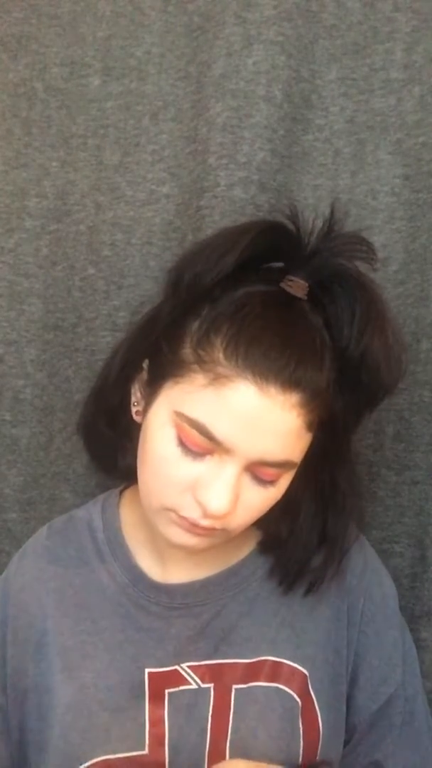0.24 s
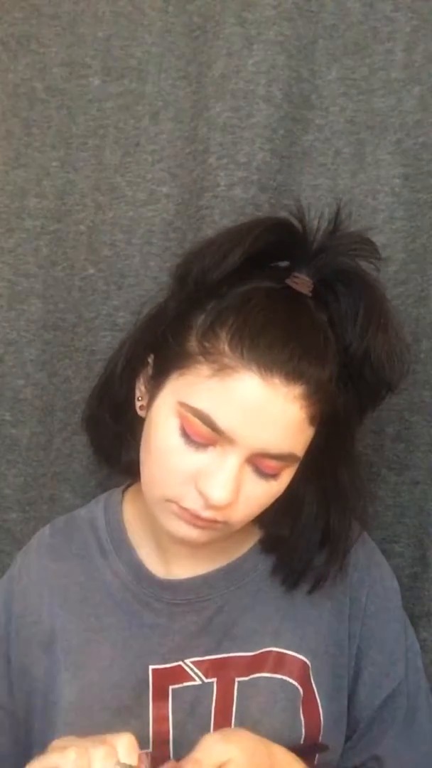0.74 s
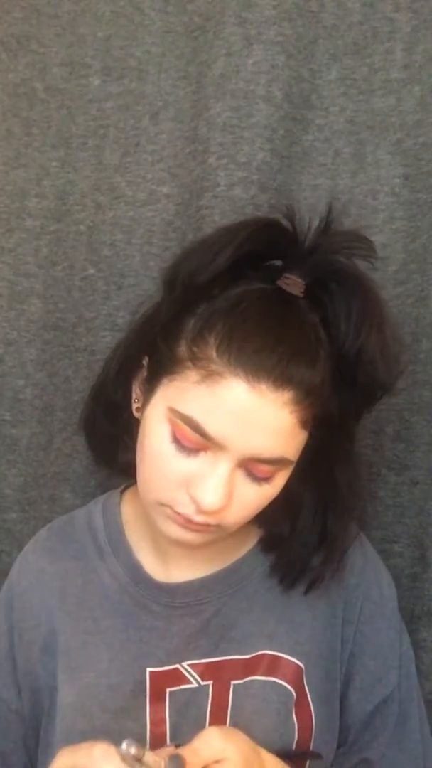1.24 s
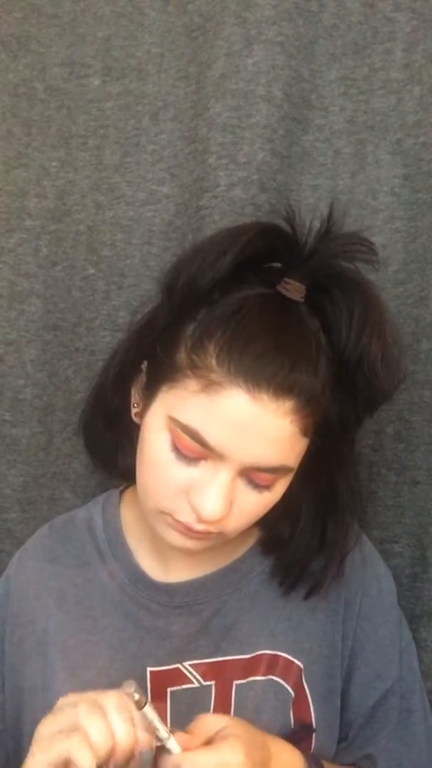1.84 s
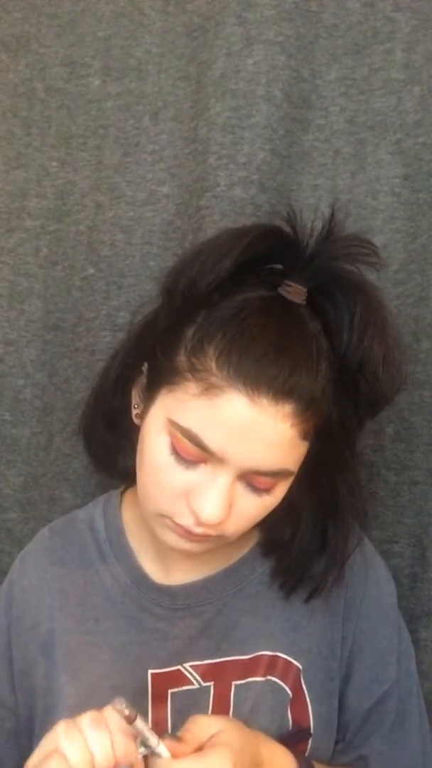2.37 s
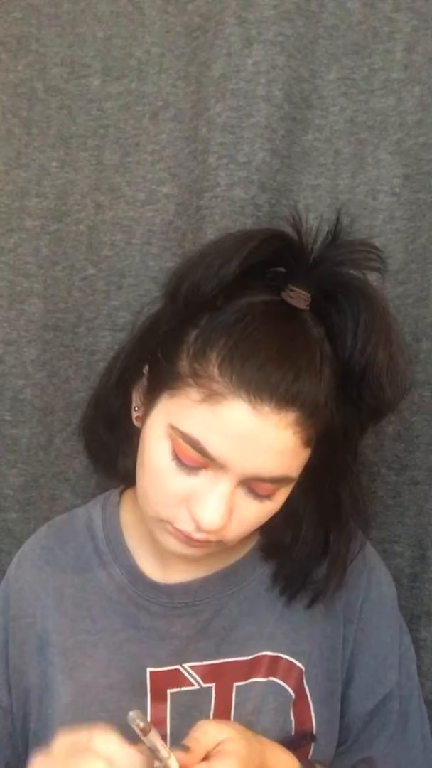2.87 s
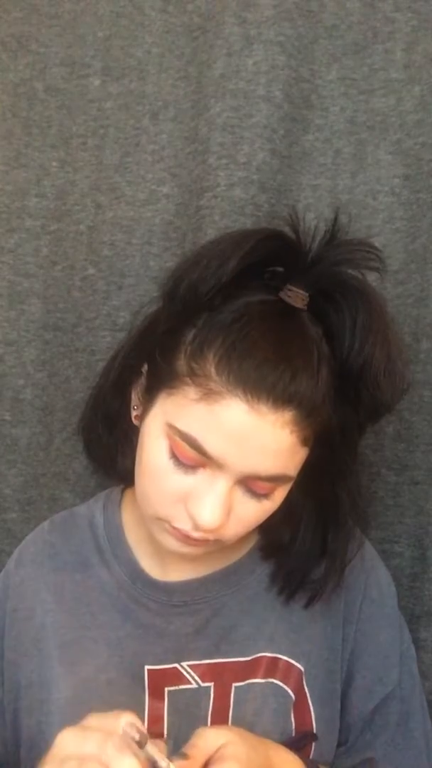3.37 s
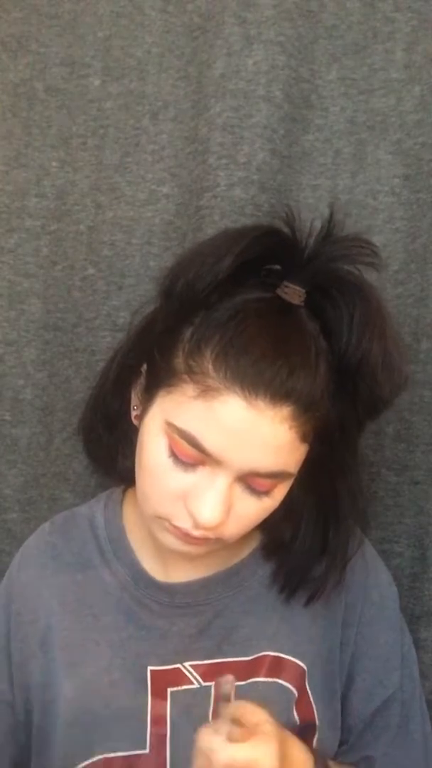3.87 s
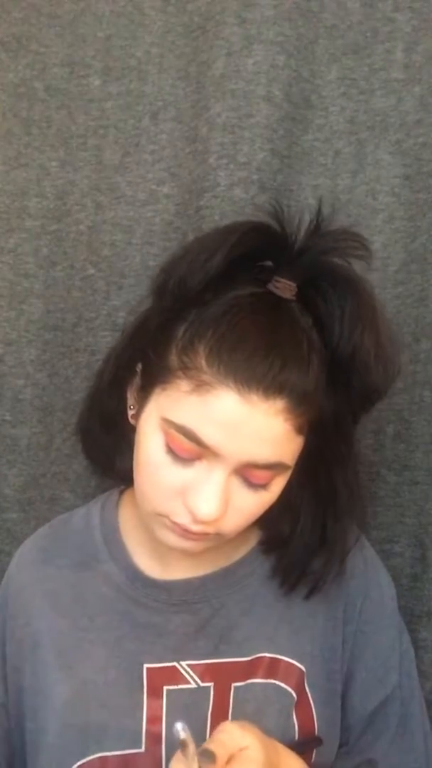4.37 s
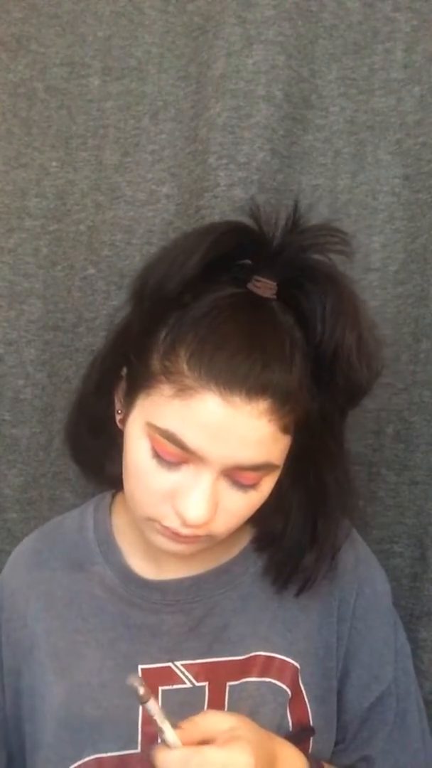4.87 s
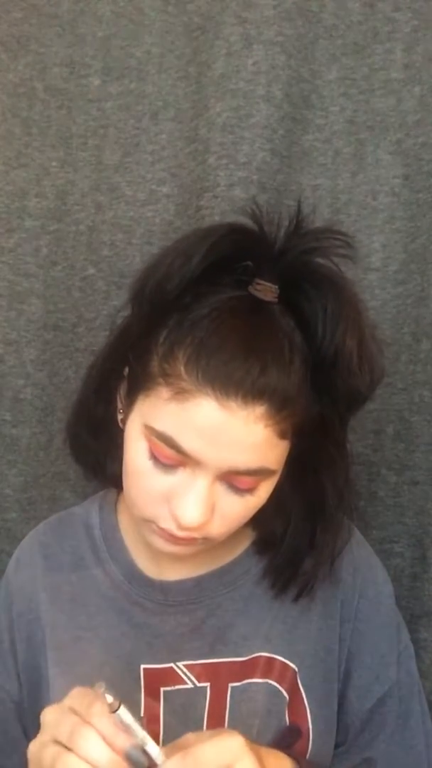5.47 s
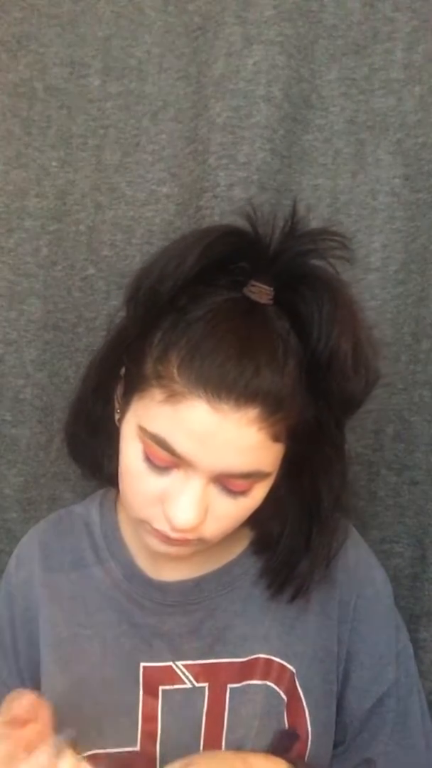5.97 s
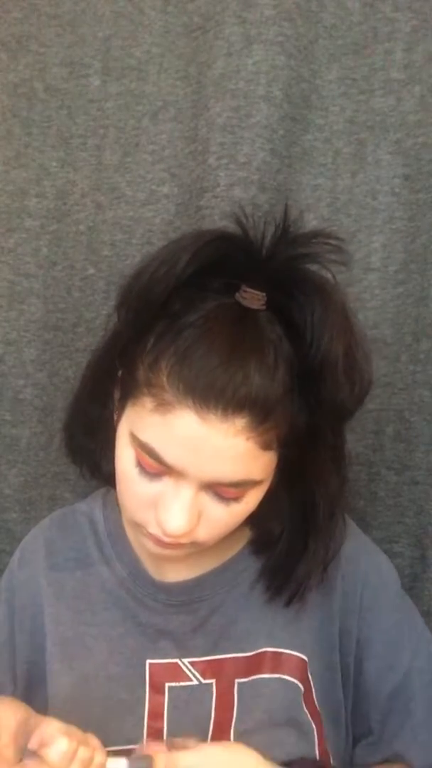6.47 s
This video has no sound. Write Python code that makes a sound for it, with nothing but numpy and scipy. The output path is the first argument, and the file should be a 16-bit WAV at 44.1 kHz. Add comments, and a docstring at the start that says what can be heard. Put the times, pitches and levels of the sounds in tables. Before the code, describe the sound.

Sparse small clicks and taps of a plastic pen turned in the fingers, one loud double snap of its cap, in a quiet humming room.

```python
"""0-6.7 s: filtered-noise hiss and a 59 Hz hum underlie hands turning a plastic pen in a small room.
0.2 s on: noise bursts ring modes of barrel and cap as taps; swells of noise brush as a sleeve.
1.5 s on: grainy noise rubs as skin; tick trains squeak at 2.0 and 2.5 s; a falling sine skids at 2.9 s.
3.8 s: the cap snaps home, a loud double click of stronger bursts over decaying low sines.
4.0 s on: taps and rubs go on; a palm scuffs at 5.7 s, a sleeve brushes from 6.1 s, both dull noise."""
import sys
import numpy as np
from scipy import signal
from scipy.fft import rfft, irfft, next_fast_len
from scipy.io import wavfile
from scipy.ndimage import uniform_filter1d, map_coordinates

SR = 44100
rng = np.random.default_rng(int(sys.argv[2]) if len(sys.argv) > 2 else 0)


def master(y):
    """Save y as 16-bit WAV."""
    cut = np.clip(np.atleast_2d(y).T, -1, 1)
    pcm = np.round(cut * 32767)  # scale
    wavfile.write(sys.argv[1], SR, pcm.astype(np.int16))


N = 296352

SIZE = 4096  # samples per contact spectrum
TOP_HZ = 16200  # band limit of the recorder
KNEE_HZ = 1870  # contact hardness tilts the spectrum above this

# Spectrum of the room hiss. Each row: frequency in Hz, relative density in dB.
AIR_SPECTRUM = [(15, -30), (32, -16.5), (50, 6.5), (95, -3), (125, -5.5), (190, -12.5), (250, -11.5),
                (420, -16.5), (1000, -20.5), (2500, -23.5), (5000, -28.5), (9000, -35), (14500, -38),
                (16000, -43.5)]
# Decay of the room tail. Each row: frequency in Hz, t60 in seconds.
ROOM_DECAY = [(300, 0.23), (2000, 0.18), (6000, 0.2216), (15000, 0.18)]
# Colour of the walls. Each row: frequency in Hz, gain in dB.
WALL_COLOUR = [(300, -2), (1300, 5.5), (2500, 2), (7000, 2), (12000, 3), (16000, -4)]
# Sleeve brushes. Each row: centre in seconds, bell half length in seconds, level in dB.
SLEEVE_BRUSHES = [(.45, 0.18, -72), (6.06, 0.057, -73), (6.32, 0.078, -68.5), (6.655, .03, -65.5)]
# Spectrum of cloth. Each row: frequency in Hz, relative level in dB.
CLOTH_SPECTRUM = [(400, -12), (1200, -7), (2800, -5.5), (4200, -7), (5500, -16), (9000, -28), (15000, -28)]
# Palm scuffs. Each row: centre in seconds, bell half length in seconds, level in dB.
PALM_SCUFFS = [(5.735, 0.0273, -69.5)]
# Spectrum of the palm. Each row: frequency in Hz, relative level in dB.
PALM_SPECTRUM = [(300, -20), (700, 0), (1150, 0), (1700, -13), (4000, -23), (12000, -39)]
# Finger rubs on the barrel. Each row: centre in seconds, bell half length in seconds, dry level in dB.
FINGER_RUBS = [(1.456, .01, -60), (1.763, 0.0031, -65), (3.02, 0.0037, -66), (3.398, 0.0075, -65),
               (4.242, 0.0096, -61), (4.272, 0.011, -64), (4.303, 0.0063, -62.5), (4.432, 0.0232, -69),
               (4.695, 0.022, -66.5), (4.857, 0.0087, -71.5)]
# Spectrum of rubbing. Each row: frequency in Hz, relative level in dB.
GRIP_SPECTRUM = [(500, -8), (1500, 1.5), (4500, 3.5), (8000, 1), (13000, -7.5), (16000, -7)]
# Stick-slip squeaks. Each row: start in seconds, length in seconds, slips per second, dry level in dB.
STICK_SLIPS = [(1.959, 0.017, 740, -62), (2.464, 0.044, 110, -72)]
# Spectrum of the slips. Each row: frequency in Hz, relative level in dB.
SLIP_SPECTRUM = [(1500, -35), (4500, -19), (6500, 1), (9000, -10), (12400, 7), (14000, 2), (16000, -13.5)]
# Edges in Hz of the five zones knock, body, clack, tick and sheen.
ZONE_EDGES_HZ = [400, 1200, 3000, 7000, 11000, 16000]
# Modes of barrel and cap. Each row: frequency in Hz, width in Hz, mean gain in dB before any ring boost.
SHELL_MODES = [(676, 200, 0.5), (1330, 190, -5), (1887, 200, -6.5), (2660, 500, 1), (3350, 274, -12.5),
               (4130, 220, -1.5), (5550, 280.4, -3.5), (6500, 240, -1.5), (9200, 400, -4),
               (12200, 550, 1.5), (13600, 400, -2.5)]
# Taps of barrel, cap and fingernails. Each row: start in seconds, dry energy in dB re full scale for 1 ms,
# hardness in dB per octave, strongest ring in Hz, rattle t60 in seconds.
TAP_EVENTS = [(0.1838, -59.5, -7.1, 5200, .011), (0.2276, -54, -4, 5600, .016),
              (0.236, -43.5, -5, 3740, 0.0046), (0.2375, -45, -2, 1470, .0086),
              (0.4845, -47, -6, 2540, .0029), (0.4927, -40, -9, 2650, 0.017),
              (0.4963, -40.5, 3, 2640, .013), (0.666, -58.5, -4.5, 6870, .016),
              (0.8856, -39.5, -8, 13000, 0.0066), (0.8967, -44, -5, 6550, 0.0044),
              (0.9218, -51, -8.5, 11070, 0.0098), (0.9802, -29, 0, 5470, 0.0043),
              (0.9823, -33, -7.5, 9300, 0.0084), (1.4615, -42, -10.5, 2700, 0.015),
              (1.6372, -46.5, -7.5, 5070, .0071), (1.6615, -48.5, -7.5, 4600, 0.0053),
              (1.824, -44, -5, 4140, 0.013), (1.8892, -43, 2.5, 14900, 0.0025),
              (1.9988, -39.5, -7, 5900, 0.0037), (2.6216, -55.5, -4, 8300, .0043),
              (2.894, -36.5, -5, 4900, 0.01), (2.9022, -41, -8, 6450, 0.063), (2.907, -39, 0, 810, .019),
              (3.2313, -52, -6.5, 13100, .03), (3.3783, -50, -6.5, 5340, .036),
              (3.5125, -44, .5, 2620, 0.012), (4.0045, -46, -8, 6330, .01),
              (4.2626, -46, -4.5, 4600, 0.047), (4.437, -52, -7.5, 6290, .025),
              (4.4522, -42, -3.5, 1670, 0.044), (4.672, -40.5, -7.5, 8600, 0.034),
              (4.815, -56, -1.5, 4400, 0.026), (5.5784, -34, -6.5, 5340, 0.015),
              (6.0716, -47, -8, 5040, .012), (6.1287, -33, -8, 1820, 0.0032),
              (6.1296, -32, -9, 2800, 0.0074), (6.5057, -48, -6, 2090, .011),
              (6.5765, -39.5, -2, 2030, 0.0048)]
# Voice of a light tap: relative dB in the five zones.
TAP_VOICE_DB = [4, 1.8, 2, -1.6, .5]
# Jolts as the cap seats. Each row: start in seconds, frequency in Hz, dry initial amplitude in dB.
CAP_THUDS = [(3.815, 150, -59), (3.838, 136.4, -52), (3.838, 390, -55.5)]
# The cap catches on its ridge, snaps home and rebounds. Each row: start in seconds,
# dry energy in dB re full scale for 1 ms, hardness in dB per octave, strongest ring in Hz,
# rattle t60 in seconds.
CAP_EVENTS = [(3.7917, -55, -2, 7100, .01), (3.8105, -38, -1, 2500, .002), (3.812, -27.5, -5, 1920, .008),
              (3.8136, -20, 1, 5620, .0036), (3.8164, -33, -2, 13050, .02), (3.8359, -23.5, -4, 3060, .005),
              (3.8376, -14.5, 0.4, 2310, 0.011), (3.847, -22, -6, 4000, .005)]
# Voice of the tight cap: relative dB in the five zones.
CAP_VOICE_DB = [-6, 2.5, 5.5, -3, 3]


def amp(db):
    """Decibels to amplitude gain."""
    return 10 ** (np.asarray(db) / 20)


def unit(x):
    """Scale to rms 1."""
    return x / np.sqrt(np.mean(x ** 2) + 1e-20)


def along(points, hz):
    """Interpolate (Hz, value) points on a log frequency axis."""
    f, v = np.transpose(points)
    return np.interp(np.log(hz + 1), np.log(f), v)


def coloured(x, points):
    """Filter x by (Hz, dB) points at zero phase."""
    m = next_fast_len(len(x) + SIZE)
    gain = amp(along(points, np.fft.rfftfreq(m, 1 / SR)))
    return irfft(rfft(x, m) * gain, m)[:len(x)]


def causal(gain):
    """Minimum-phase response of this gain: nothing sounds before the blow."""
    cepstrum = irfft(np.log(np.maximum(gain, 1e-6)))
    cepstrum[1:SIZE // 2] *= 2
    cepstrum[SIZE // 2 + 1:] = 0
    return np.exp(rfft(cepstrum))


def add(track, start_s, x):
    """Mix x into the track at start_s."""
    start = round(start_s * SR)
    track[start:start + len(x)] += x[:max(N - start, 0)]


def in_room(x, wet_db=-11, gap_s=.003, table_db=-15):
    """x plus one bounce off the table and a short random tail from the walls."""
    hz, t, z = signal.stft(rng.standard_normal(SR // 3), SR, nperseg=256)
    decay = amp(-60 * t / along(ROOM_DECAY, hz)[:, None])
    tail = signal.istft(z * decay, SR, nperseg=256)[1]
    tail *= 1 - np.exp(-(np.arange(len(tail)) / SR / gap_s) ** 2)  # gradual onset
    response = amp(wet_db) * coloured(tail / np.linalg.norm(tail), WALL_COLOUR)
    response[0] += 1
    response[int(SR * rng.uniform(.0025, .004))] += amp(table_db)
    return signal.fftconvolve(x, response)


def swells(rows):
    """Bell-shaped strokes from (centre s, half length s, dB) rows."""
    t = np.arange(N) / SR
    return sum(amp(db) * np.exp(-.5 * ((t - s) / half_s) ** 2) for s, half_s, db in rows)


def grainy(spectrum, grain_db, grains_per_s):
    """Friction noise of rms 1 whose level wanders randomly, as skin or cloth catches and lets go."""
    knots = np.arange(N) / SR * grains_per_s
    grains = map_coordinates(rng.standard_normal(N), [knots], order=1)
    return unit(coloured(amp(grain_db * grains) * rng.standard_normal(N), spectrum))


def resonance(hz, centre_hz, width_hz):
    """Response of one damped mode."""
    return 1j * hz * width_hz / (centre_hz ** 2 - hz ** 2 + 1j * hz * width_hz)


def zone_levels(voice_db, energy_db, hardness_db_per_octave, ring_hz, cut_share, cut_order):
    """Share a blow's energy among zones: hard contacts reach higher, little sounds below the ring."""
    hz = np.sqrt(np.multiply(ZONE_EDGES_HZ[:-1], ZONE_EDGES_HZ[1:]))
    octaves = np.log2(np.maximum(hz / KNEE_HZ, 1))
    tilted_power = amp(voice_db + hardness_db_per_octave * octaves) ** 2
    power = tilted_power / (1 + (cut_share * ring_hz / hz) ** cut_order)
    return energy_db + 10 * np.log10(power / power.sum())


def contact(rattle_t60_s, spot_hz, zone_db, snap_t60_s=0.0011, rattle_db=0.0, ring_db=0,
            spot_db=1, spot_damping=.14, bass_db=-12):
    """A hard snap and a dying micro-rattle ring the shell; the struck spot sets the colour."""
    t, hz = np.arange(SIZE) / SR, np.fft.rfftfreq(SIZE, 1 / SR)
    snap = unit(rng.standard_normal(SIZE) * amp(-60 * t / snap_t60_s))
    rattle = unit(rng.laplace(size=SIZE) * amp(-60 * t / rattle_t60_s))
    # a longer rattle weighs more against the snap
    force = rfft(snap + amp(rattle_db) * rattle_t60_s / 0.0051 * rattle)
    # even out the broad power spectrum of the force
    smooth_power = uniform_filter1d(abs(force) ** 2, size=60)
    force = force * causal(abs(smooth_power) ** -.5)
    # each mode's gain varies from blow to blow
    shell = 1 + sum(amp(ring_db + db + rng.normal(0, 1.48)) * resonance(hz, centre_hz, width_hz)
                    for centre_hz, width_hz, db in SHELL_MODES)
    spot = 1 + amp(spot_db) * resonance(hz, spot_hz, spot_damping * spot_hz)
    # so small a body radiates little bass
    radiation_db = [(60, 2 * bass_db), (300, bass_db), (1300, -0.5),
                    (14000, -5.5), (16000, -12), (18000, -15)]
    z = force * shell * spot * causal(amp(along(radiation_db, hz)))
    low_hz, high_hz = np.array(ZONE_EDGES_HZ[:-1]), np.array(ZONE_EDGES_HZ[1:])
    # two passes bring each zone near its share of the energy
    for _ in range(2):
        energy = [2 * np.sum(abs(z[(hz >= a) & (hz < b)]) ** 2) / SIZE / (SR / 1000)
                  for a, b in zip(low_hz, high_hz)]
        correction_db = zone_db - 10 * np.log10(energy)
        z = z * causal(amp(along(np.c_[np.sqrt(low_hz * high_hz), correction_db], hz)))
    # keep the first half of the block, so that no wrapped-around tick follows the blow
    return irfft(z)[:SIZE // 2]


def room_floor(air_db=-63.0, hum_db=-62.0, hum_hz=59, hum_width_hz=7):
    """Coloured noise hisses; a sine plus narrow-band noise makes a wavering low hum."""
    hz = np.fft.rfftfreq(N, 1 / SR)
    hum_gain = 1 / (1 + ((hz - hum_hz) / hum_width_hz) ** 2)
    wavering = unit(irfft(rfft(rng.standard_normal(N)) * hum_gain, N))
    steady = np.sqrt(2) * np.sin(2 * np.pi * hum_hz * np.arange(N) / SR)
    hiss = unit(coloured(rng.standard_normal(N), AIR_SPECTRUM))
    return amp(air_db) * hiss + amp(hum_db) * unit(wavering + .7 * steady)


def sleeve(grain_db=1.5, grains_per_s=120):
    """Cloth friction noise swells and fades as the hand shifts its hold."""
    return swells(SLEEVE_BRUSHES) * grainy(CLOTH_SPECTRUM, grain_db, grains_per_s)


def palm(grain_db=2, grains_per_s=150):
    """Dry skin friction scuffs dully as the grip changes."""
    return swells(PALM_SCUFFS) * grainy(PALM_SPECTRUM, grain_db, grains_per_s)


def rubs(grain_db=5, grains_per_s=900):
    """Skin drags over plastic in short grainy swells."""
    return in_room(swells(FINGER_RUBS) * grainy(GRIP_SPECTRUM, grain_db, grains_per_s))[:N]


def chirp(start_hz=5400, end_hz=3700, peak_db=-63, rough_rad=0.4):
    """A fingertip skids on the barrel: a falling sine blurred by a random phase walk."""
    start_s, length_s = 2.8675, .012
    t = np.arange(int(length_s * SR)) / SR
    glide_hz = start_hz + (end_hz - start_hz) * t / length_s
    phase = 2 * np.pi * np.cumsum(glide_hz) / SR
    # uneven slips blur the pitch
    phase = phase + rough_rad * np.cumsum(rng.standard_normal(len(t)))
    out = np.zeros(N)
    add(out, start_s, in_room(amp(peak_db) * np.hanning(len(t)) * np.sin(phase)))
    return out


def squeaks(jitter=.08, slip_t60_s=0.0043, fade_db=-7):
    """Tight plastic sticks and slips: an uneven, weakening train of decaying noise ticks."""
    out = np.zeros(N)
    for start_s, length_s, slips_per_s, db in STICK_SLIPS:
        t = np.arange(int(length_s * SR)) / SR
        slips_s = np.cumsum(1 + jitter * rng.standard_normal(32)) / slips_per_s
        since_slip_s = t - np.r_[0, slips_s][np.searchsorted(slips_s, t)]
        envelope = amp(-60 * since_slip_s / slip_t60_s + fade_db * t / length_s)
        train = rng.standard_normal(len(t)) * envelope
        add(out, start_s, in_room(amp(db) * unit(coloured(train, SLIP_SPECTRUM))))
    return out


def taps(cut_share=0.98, cut_order=4.3):
    """Loose parts of the pen knock together and ring as the fingers turn it."""
    out = np.zeros(N)
    for start_s, energy_db, hardness, ring_hz, t60_s in TAP_EVENTS:
        zone_db = zone_levels(TAP_VOICE_DB, energy_db, hardness, ring_hz, cut_share, cut_order)
        tap = contact(t60_s, ring_hz, zone_db, spot_db=7.5, spot_damping=0.18)
        add(out, start_s, in_room(tap))
    return out


def thuds(t60_s=0.09):
    """The seating cap jolts the hands: soft decaying low sines under the two cracks."""
    out, t = np.zeros(N), np.arange(SIZE) / SR
    for start_s, hz, db in CAP_THUDS:
        add(out, start_s, in_room(amp(db - 60 * t / t60_s) * np.sin(2 * np.pi * hz * t)))
    return out


def cap_snap(cut_share=0.81, cut_order=3.5):
    """The cap is pressed home: clustered hard contacts make two loud, broad cracks."""
    out = np.zeros(N)
    for start_s, energy_db, hardness, ring_hz, t60_s in CAP_EVENTS:
        zone_db = zone_levels(CAP_VOICE_DB, energy_db, hardness, ring_hz, cut_share, cut_order)
        crack = contact(t60_s, ring_hz, zone_db, snap_t60_s=.0018, ring_db=2,
                        spot_db=3, spot_damping=.35)
        add(out, start_s, in_room(crack, wet_db=-13.0))
    return out


def scene():
    """The pen in the hands, over the room's floor."""
    background = room_floor() + sleeve() + palm()
    friction = rubs() + chirp() + squeaks()
    blows = taps() + thuds() + cap_snap()
    return (background + friction + blows)[None]


def record(dry):
    """A steep elliptic low-pass removes what lies above the recorder's band limit."""
    low_pass = signal.ellip(10, .1, 70, TOP_HZ, fs=SR, output="sos")
    return signal.sosfilt(low_pass, dry)


dry = scene()
out = record(dry)
master(out)
```